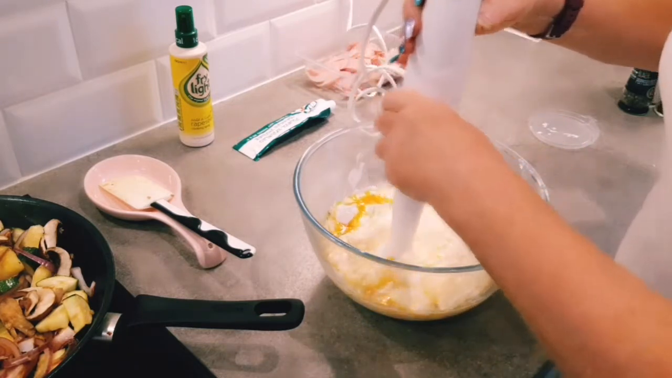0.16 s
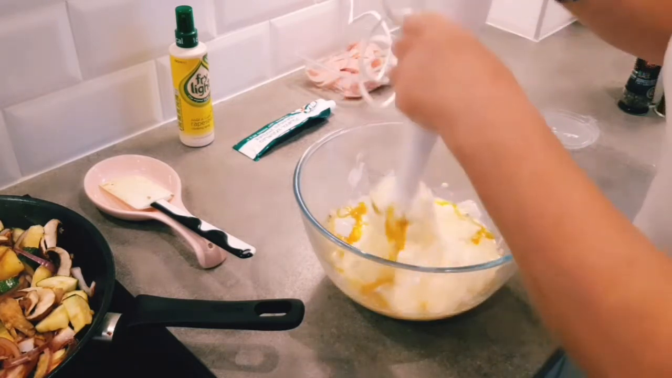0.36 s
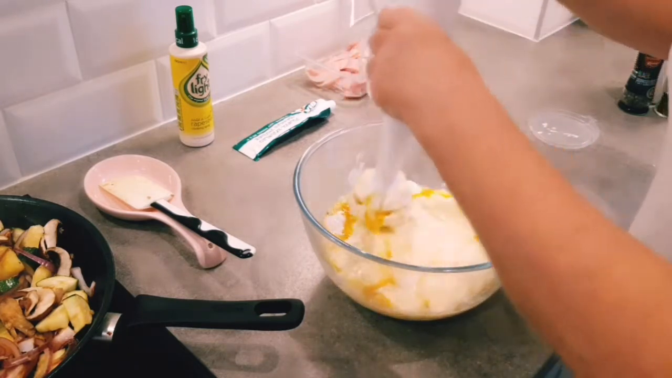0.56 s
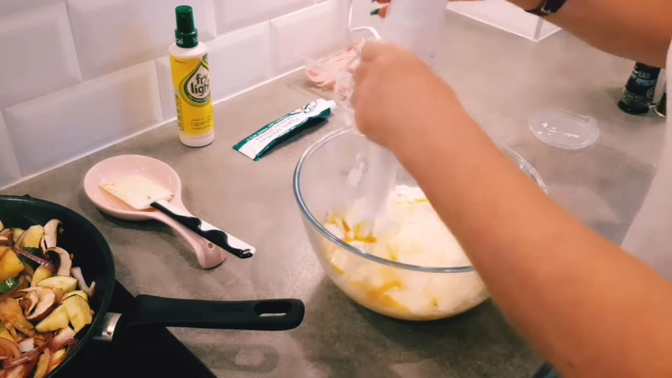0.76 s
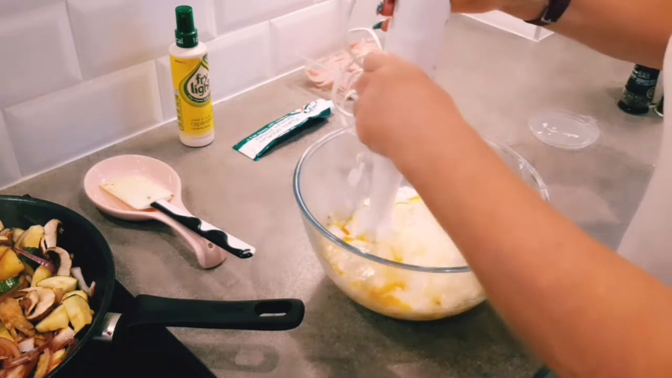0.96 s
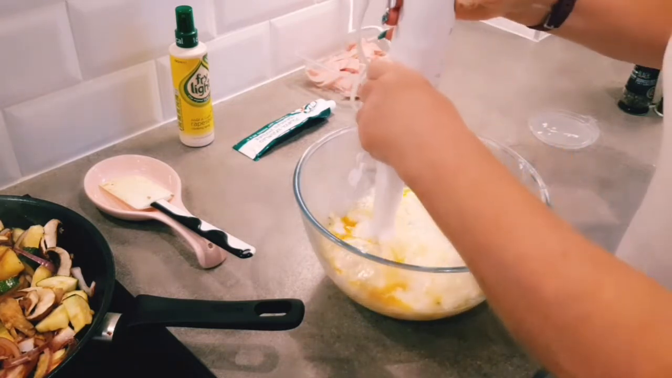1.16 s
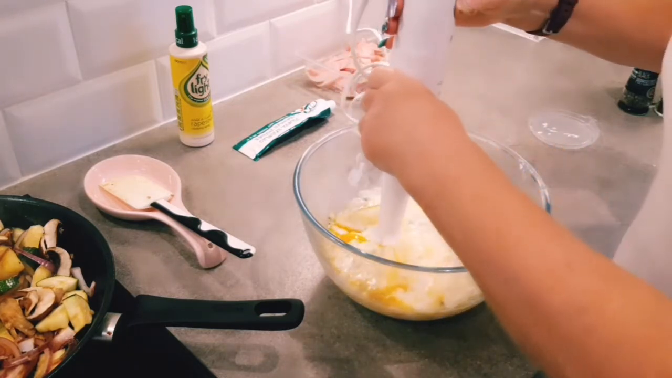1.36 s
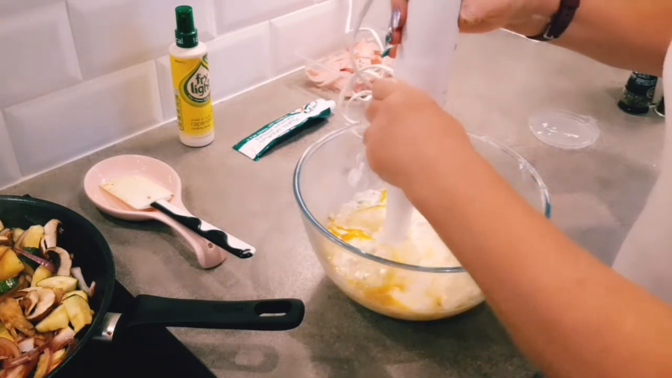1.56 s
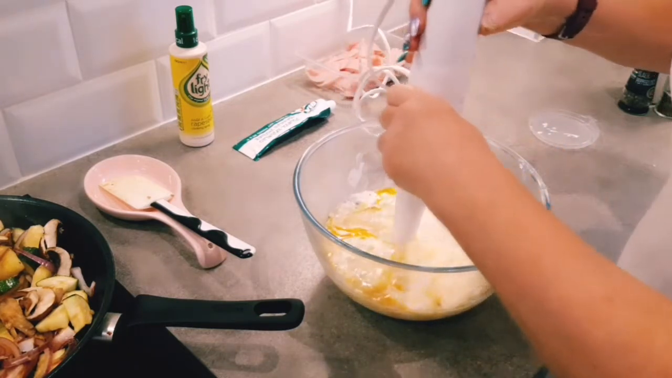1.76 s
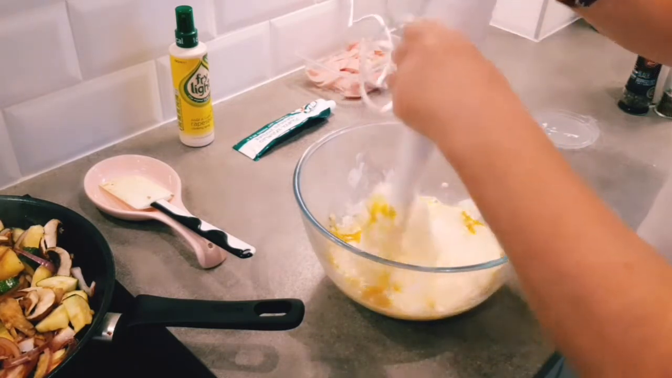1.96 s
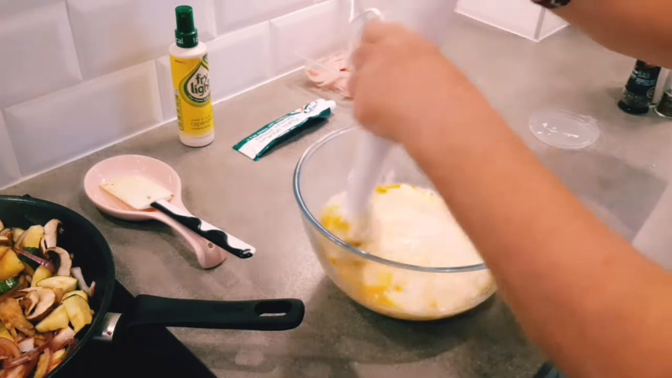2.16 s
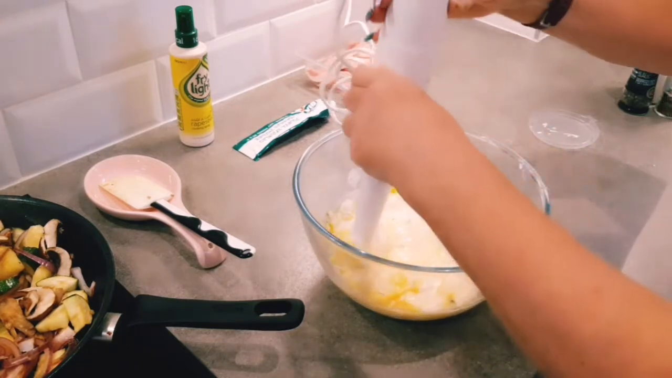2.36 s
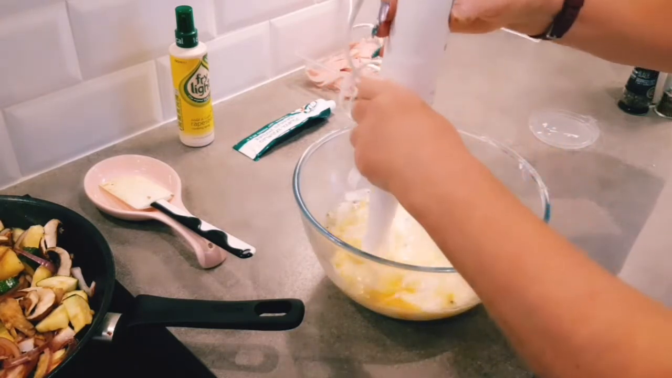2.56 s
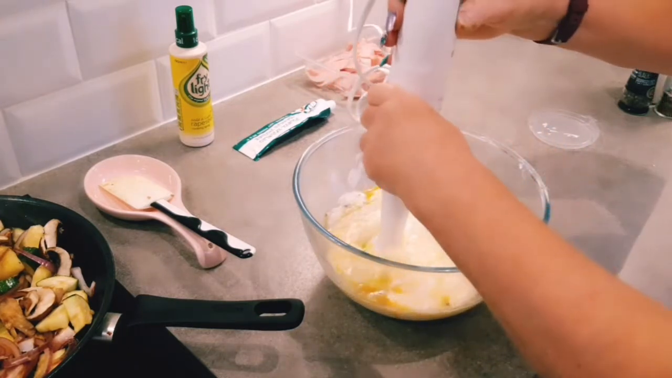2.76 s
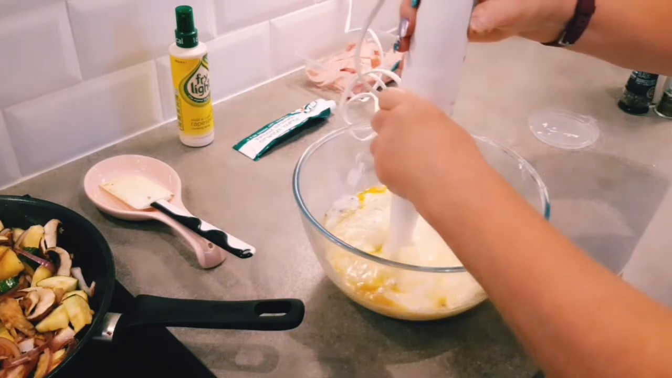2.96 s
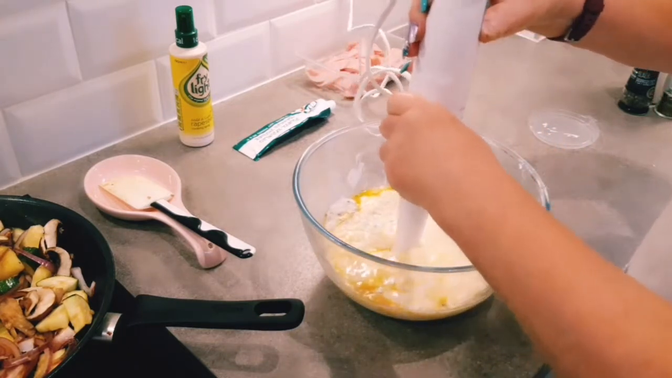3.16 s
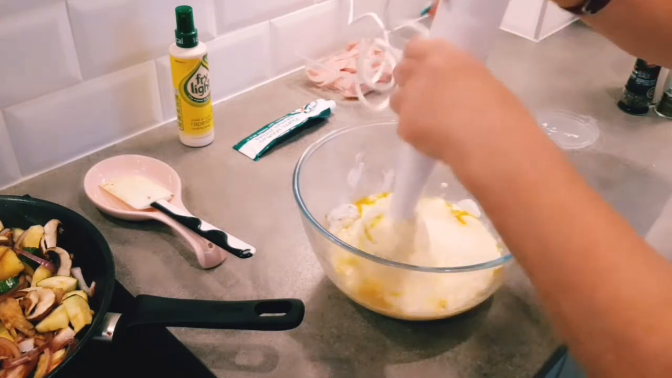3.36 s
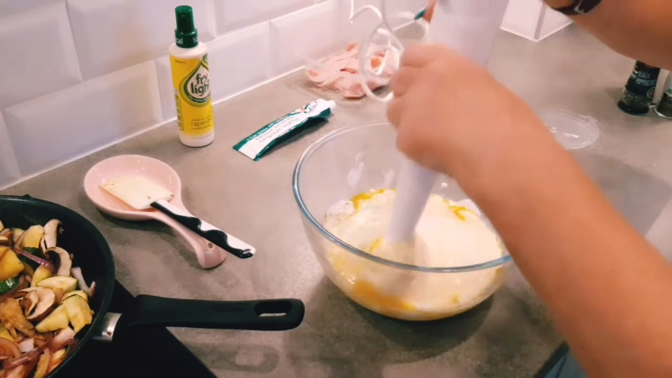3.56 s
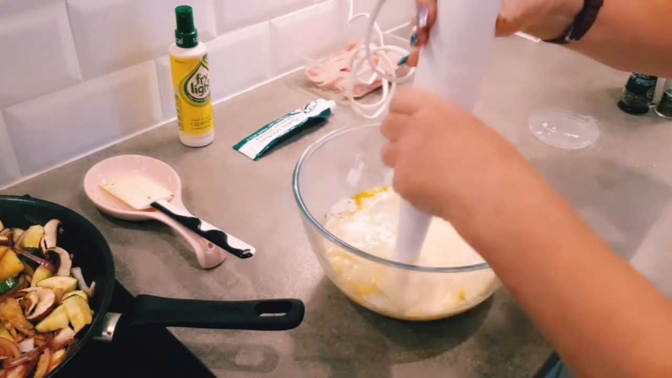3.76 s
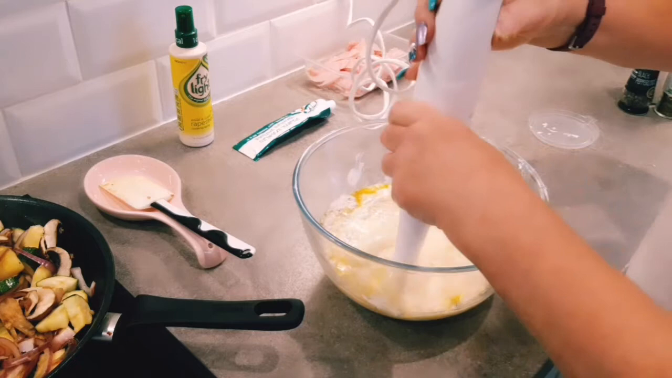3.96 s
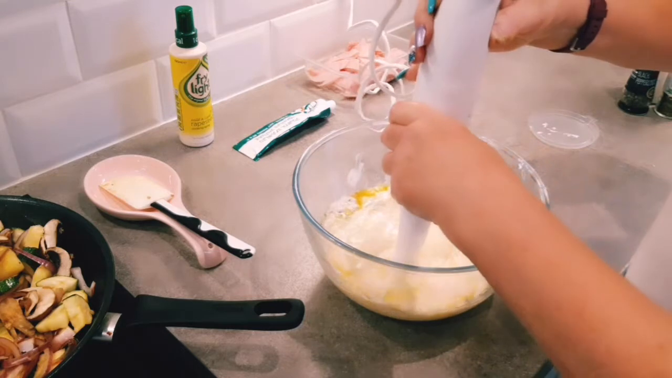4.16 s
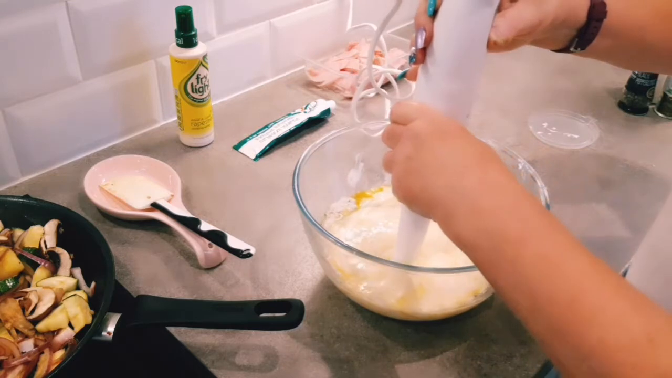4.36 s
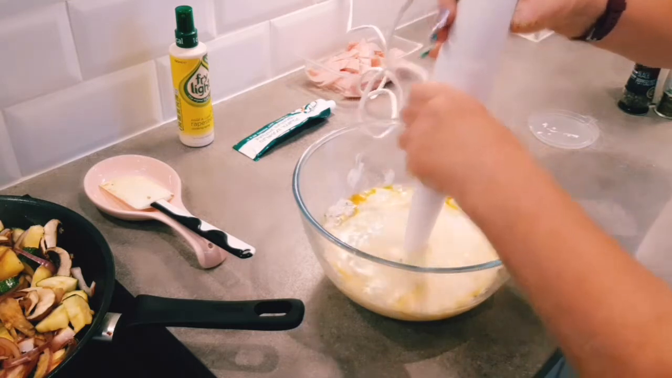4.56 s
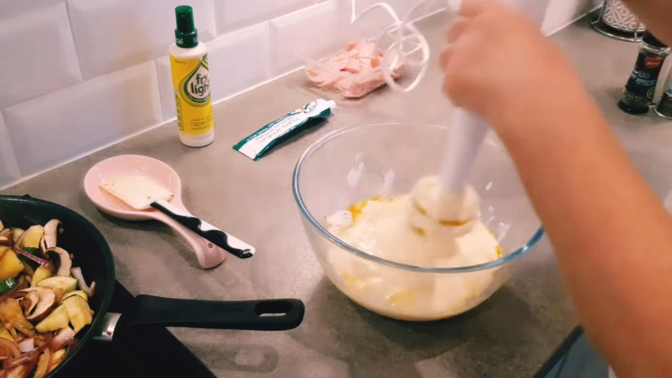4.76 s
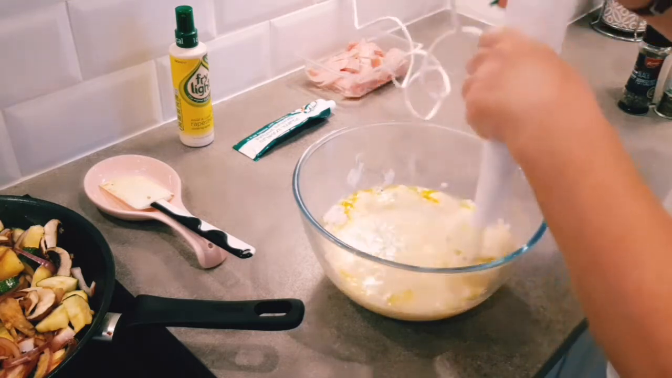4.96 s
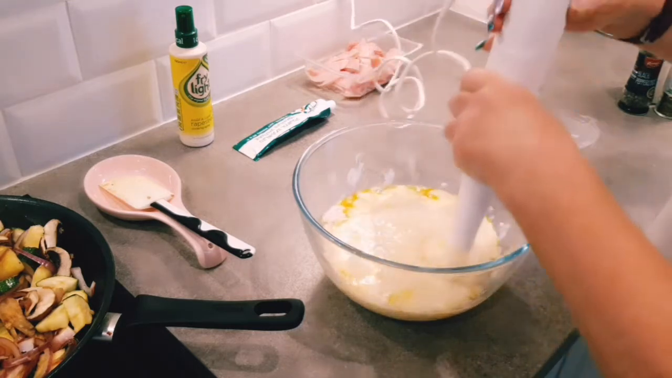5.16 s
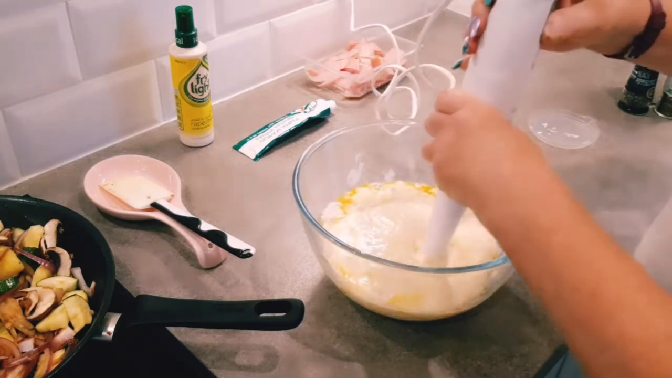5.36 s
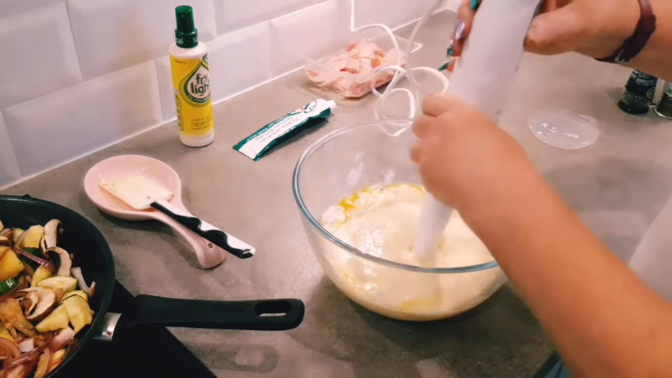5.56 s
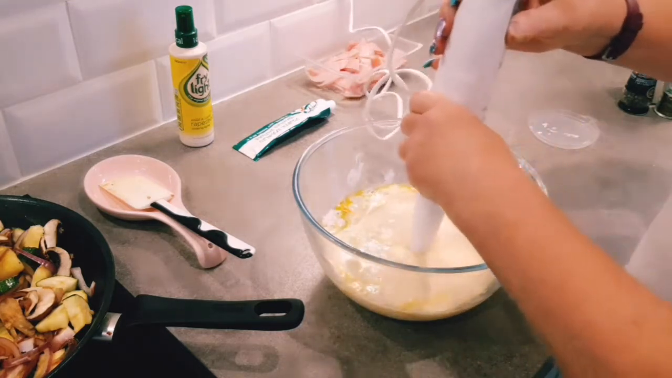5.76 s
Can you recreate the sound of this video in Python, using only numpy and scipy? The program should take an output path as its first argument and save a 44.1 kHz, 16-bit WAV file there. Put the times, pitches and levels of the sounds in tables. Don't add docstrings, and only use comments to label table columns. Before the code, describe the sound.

A hand-held stick blender whirs in five short bursts through thick batter in a glass bowl, with glassy knocks between bursts in a kitchen.

```python
import sys
import numpy as np
from scipy import signal
from scipy.fft import rfft, irfft, next_fast_len
from scipy.io import wavfile

SR = 44100
rng = np.random.default_rng(int(sys.argv[2]) if len(sys.argv) > 2 else 0)


def wav_record(signal):
    frames = np.transpose(np.atleast_2d(signal))
    bounded = np.clip(frames, -1, 1)
    quanta = np.round(bounded * 32767).astype(np.int16)
    wavfile.write(sys.argv[1], SR, quanta)


def elevation(decibels):
    levels = np.asarray(decibels, float)
    return 10 ** (levels / 20)


N = 260190

# (press [s], release [s], roar level [dB], roar rise [s], drone offset at start [dB])
PRESSES = [
    (-.4, 0.159, -20.5, .04, 15),
    (1.125, 1.729, -21, 0.024, -17.5),
    (2.552, 3.175, -21, 0.023, -29),
    (3.951, 4.472, -20, 0.025, 2),
    (5.272, 5.815, -21, 0.033, -9),
]


def batter():
    # (frequency [Hz], density [dB per Hz])
    roar_spectrum = [(45, -51), (130, -4.5), (204, -16.5), (300, -4.5), (444, -10.5), (600, -7),
                     (1500, -10), (2250, -12), (2600, -20.5), (4700, -21.5), (6300, -31), (7900, -52),
                     (8500, -35), (12500, -29.5)]
    # (frequency [Hz], bandwidth [Hz], level [dB])
    resonances = [(275, 30, -24), (400, 35, -20), (510, 35, -21), (610, 45, -15), (735, 70, -17),
                  (955, 70, -15), (1158, 50, -17), (1450, 30, -21), (1805, 75, -15), (2830, 50, -27)]
    whirr_db, dulling_db_per_s = 6.5, 23
    gain, rumble_db, drone_db, hiss_db = churning()
    since_off = burst_clock()[2]
    dulling_db = -dulling_db_per_s * since_off
    shift_db = (rumble_db + 10.5, drone_db + 8.5, dulling_db, hiss_db + 10.5)
    sound = banded_noise(roar_spectrum, patchy_db=1.5, likeness=0.97, shift_db=shift_db)
    white = rng.standard_normal((2, N))
    for hz, width, level_db in resonances:
        r = np.exp(-np.pi * width / SR)
        peak = signal.lfilter([1, 0, -1], [1, -2 * r * np.cos(2 * np.pi * hz / SR), r * r], white)
        lasting_db = np.zeros(N)
        if hz < 700:
            lasting_db = lasting_db + .5 * (drone_db + 8.0)
        if hz == 610:
            lasting_db = lasting_db + whirr_db * np.tanh(since_off / .06)
        if hz > 1300:
            lasting_db = lasting_db + dulling_db
        swelling = elevation(level_db + lasting_db + 1.53 * drift(4.4))
        sound = sound + swelling * stereo_noise(hz, rms_one(peak), 1)
    return gain * elevation(2.5) * sound


def churning():
    # (time [s], level [dB], length [s])
    lumps = [
        (.008, 0, .02),
        (1.142, -4, 0.0067),
        (3.992, 1.5, 0.0047),
        (1.18, -1, .015),
        (2.714, 4, 0.0058),
        (2.778, 2.5, 0.0068),
        (4.193, 1, 0.0043),
        (5.89, 2.5, 0.011),
    ]
    drop_db, drop_s, coast_db_per_s = 4, 0.033, 91.5
    lows_linger_db_per_s = 6
    which, since_on, since_off = burst_clock()
    roar_db, rise, deficit_db = np.transpose(PRESSES)[2:, which]
    for s, db, length in lumps:
        roar_db = roar_db + db * np.exp(-((np.arange(N) / SR - s) / length) ** 2)
    fall_db = drop_db * (1 - np.exp(-since_off / drop_s)) + coast_db_per_s * since_off
    gain = (1 - np.exp(-since_on / rise)) ** 2 * elevation(roar_db - fall_db)
    coast = 1 - np.exp(-since_off / 0.02)
    linger_db = lows_linger_db_per_s * since_off
    rumble_db = -18.5 + 4.5 * coast + linger_db
    drone_db = -8 + deficit_db * np.exp(-since_on / .15) + 2 * coast + linger_db / 2
    hiss_db = -16 + 15.5 * np.exp(-since_on / rise) + 4.5 * coast
    return gain, rumble_db, drone_db, hiss_db


def motor():
    # (settling speed [Hz], shortfall at start [Hz], catch-up [s],
    # climb as the batter thins [Hz per s])
    spin_up = [(154, 0, .1, 0), (141.2, 25.3, .08, 25.4), (151.5, 27.3, .13, 12.9), (150.5, 14, .05, 7),
               (145.9, 17, .13, 14.4)]
    # (1st multiple [dB], 2nd [dB], 4th [dB], mains buzz [dB])
    grip_levels = [(-30, -34, -30.5, -49), (-28.5, -31, -21, -44.5), (-37.5, -31.5, -24, -50),
                   (-34.5, -34.5, -26.5, -60), (-35.5, -31, -21.5, -36.5)]
    # (frequency [Hz], level [dB])
    housing_response = [
        [(115, -19), (130, -1), (140, -4), (149, -1.5), (157, -16)],
        [(280, -13), (300, -25), (308, 2.5), (316, 6), (320, -17)],
        [(540, -19), (570, -6), (600, -3.5), (635, 2.5)],
    ]
    hum_rise_s, hum_fall_db_per_s = .03, 260
    buzz_rise_s, buzz_fall_db_per_s, mains_hz = 0.13, 200, 100
    which, since_on, since_off = burst_clock()
    settle, shortfall, catch_up, climb = np.transpose(spin_up)[:, which]
    turns = settle - shortfall * np.exp(-since_on / catch_up) + climb * (since_on - since_off)
    *levels_db, buzz_db = np.transpose(grip_levels)[:, which]
    phase = 2 * np.pi * np.cumsum(turns * (1 + 0.0016 * drift(30.0))) / SR
    hum = 0
    for k, db, housing in zip((1, 2, 4), levels_db, housing_response):
        level_db = db + at_hz(housing, k * turns) + swell_db(k) + 0.3 * drift(45.0)
        hum = hum + elevation(level_db) * np.sin(k * phase)
    hum_since_off = burst_clock(lead=0.026)[2]
    hum = hum * (1 - np.exp(-since_on / hum_rise_s)) * elevation(-hum_fall_db_per_s * hum_since_off)
    buzz_level = elevation(buzz_db - buzz_fall_db_per_s * since_off + 2.0 * drift(9.0))
    buzz = (1 - np.exp(-since_on / buzz_rise_s)) * buzz_level
    return np.sqrt(2) * (hum + buzz * np.sin(2 * np.pi * mains_hz * np.arange(N) / SR))


def swell_db(multiple):
    # (time [s], length [s], multiple of the shaft speed, level [dB])
    hand_shifts = [
        (.1, .05, 2, 4),
        (2.64, .04, 1, 8),
        (3.17, .03, 1, 12),
        (3.2, .05, 4, 9),
        (4.23, .08, 1, 5),
        (4.43, .05, 2, 3),
        (1.3, .06, 4, 3),
        (5.3, .06, 1, -10),
        (5.71, .08, 4, 5),
        (5.8, .06, 2, 4),
    ]
    t = np.arange(N) / SR
    return sum(db * np.exp(-((t - s) / length) ** 2) for s, length, k, db in hand_shifts if k == multiple)


def burst_clock(lead=0):
    t, (on, off) = np.arange(N) / SR, np.transpose(PRESSES)[:2]
    which = np.searchsorted(on, t) - 1
    return which, t - on[which], np.maximum(t - off[which] + lead, 0)


def knocks():
    # (time [s], crack level [dB], note level [dB], note frequency [Hz],
    # worktop thud level [dB])
    set_downs = [
        (0.6753, -24.5, -21, 1690, -29),
        (2.1926, -18, -20.5, 1810, -26),
        (3.6629, -31.5, -29.5, 1810, -30.5),
        (4.9372, -25.5, -36, 2048, -30.5),
        (5.1758, -40, -68, 2513, -74.5),
        (5.2782, -37, -40, 1520, -44),
    ]
    # (frequency [Hz], level [dB], T60 [s])
    worktop_modes = [(105, -8, .25), (129, 1, .35), (165, -4, .25), (222, -6, .2), (268, -5, .2),
                     (328, -3, .2), (441, -11, .15), (497, -11, .25)]
    # (frequency [Hz], level [dB], T60 [s])
    low_glass_modes = [(389, -1, .6), (397, -14, .5), (641, -17, .4)]
    tick, push, rocking = np.zeros((3, N))
    t = np.arange(8000) / SR
    chances = rng.standard_normal((len(set_downs), 2, 8000))
    for (s, crack_db, note_db, note_hz, thud_db), chance in zip(set_downs, chances):
        i = round(s * SR)
        note = np.sin(2 * np.pi * note_hz * t) * (t / .0011) * np.exp(1 - t / .0011)
        crack_decay = np.exp(-t / .006) + elevation(-11) * np.exp(-t / .03)
        crack = chance[0] * (1 - np.exp(-t / .002)) * crack_decay
        tick[i:i + 8000] += elevation(crack_db + 2.5) * crack + elevation(note_db) * note
        push[i + round(.007 * SR)] += elevation(thud_db - 5)
        rustle = (1 - np.exp(-(t / .008) ** 2)) * np.exp(-t / 0.08)
        rocking[i:i + 8000] += elevation(thud_db + 8) * chance[1] * rustle
    tick_band = signal.butter(4, [700, 5000], "band", fs=SR, output="sos")
    thud_band = signal.butter(3, [90, 500], "band", fs=SR, output="sos")
    body = ring(push, worktop_modes + low_glass_modes) + rocking
    return signal.sosfilt(tick_band, tick) + signal.sosfilt(thud_band, body)


def glass():
    # (time [s], level [dB],
    # tilt away from the main mode [dB per octave])
    touches = [
        (.6755, -41, -9),
        (2.1929, -36.5, 0),
    ]
    # (frequency [Hz], level [dB], T60 [s])
    high_glass_modes = [(958, -6, .5), (966, -9, .45), (1745, -5, .4), (1736, -5, .4), (1722, -9, .3),
                        (2692, -3, .3), (2712, -7, .25), (3822, -5, .3), (3790, -8, .25), (5190, -12, .1)]
    spark_band = signal.butter(4, 9000, "high", fs=SR, output="sos")
    t = np.arange(3000) / SR
    out = np.zeros(N)
    for s, level_db, tilt_db in touches:
        start = round(s * SR)
        touch = signal.unit_impulse(N, start) * elevation(level_db)
        tilted = [(hz, db + tilt_db * abs(np.log2(hz / 1740)), t60) for hz, db, t60 in high_glass_modes]
        out += ring(touch, tilted)
        spark = rng.standard_normal(3000) * np.exp(-t / 0.019) * elevation(level_db + 3.0 * tilt_db + 2)
        out[start:][:3000] += signal.sosfilt(spark_band, spark)
    return out


def kitchen(x):
    t60_s, wall_cut_hz = .6, 5000
    size = next_fast_len(N + SR)
    hz = np.arange(size // 2 + 1) * SR / size
    out = np.zeros((2, len(hz)), complex)
    for k, lag in enumerate(rng.uniform(0.011, .04, 12)):
        loop = elevation(-60 * lag / t60_s) / (1 + 1j * hz / wall_cut_hz) * np.exp(-2j * np.pi * hz * lag)
        out[k % 2] += loop / (1 - loop) * (-1) ** (k // 2)
    return irfft(rfft(x, size) * out, size)[:, :N]


def room_tone():
    # (frequency [Hz], density [dB per Hz])
    tone_spectrum = [(24, -54), (40, -21), (98, -13.5), (139, -9), (235, -11), (368, -4), (449, -17),
                     (838, -12), (1380, -19), (1680, -16), (2770, -18.5), (3140, -16), (4800, -16.5),
                     (7160, -29.5), (15500, -23.5)]
    return elevation(-47) * banded_noise(tone_spectrum, patchy_db=.7, likeness=.9)


def ring(push, modes):
    out = 0
    for hz, level_db, t60 in modes:
        r, w = elevation(-60 / (t60 * SR)), 2 * np.pi * hz / SR
        mode = signal.lfilter([0, np.sin(w)], [1, -2 * r * np.cos(w), r * r], push + 1e-18)
        out = out + elevation(level_db) * mode
    return out


def banded_noise(spectrum, patchy_db, likeness, shift_db=(0, 0, 0, 0)):
    size = next_fast_len(N)
    hz = np.maximum(np.arange(size // 2 + 1) * SR / size, 1)
    white = rfft(rng.standard_normal((2, size)))
    coloured = stereo_noise(hz, white, likeness) * elevation(at_hz(spectrum, hz))
    coloured = coloured / np.sqrt(np.mean(np.abs(coloured) ** 2) / size)
    octaves = np.clip(np.log2(hz / 1000), -5, 4)
    region_weights = np.eye(5)[[0, 1, 3, 4]]
    out, together = 0, .35 * drift(8.9)
    for octave in np.arange(-5, 4.1, .5):
        band = np.clip(1 - 2 * np.abs(octaves - octave), 0, 1)
        shares = [np.interp(octave, [-2, -1, 0, 1, 2.5], row) for row in region_weights]
        shift = sum(share * db for share, db in zip(shares, shift_db))
        flicker = elevation(shift + patchy_db * (together + drift(21.0)))
        out = out + flicker * irfft(coloured * band, size)[:, :N]
    return out


def stereo_noise(hz, white, likeness):
    # (frequency [Hz], likeness [0-1])
    coherence = [(40, .5), (80, 0.8), (130, 0.9), (300, 1), (640, 0.7), (1400, 0.84), (3000, 0.24),
                 (6000, 0), (15000, 0)]
    alike = np.clip(likeness * at_hz(coherence, hz), 0, 1)
    return np.sqrt(1 + alike) * white[0] + np.sqrt(1 - alike) * white[1] * [[1], [-1]]


def drift(rate):
    r = np.exp(-80 * np.pi * rate / SR)
    slow = signal.lfilter([1], [1, -2 * r, r * r], rng.standard_normal(N // 40 + 2002))[2000:]
    return np.interp(np.arange(N) / 40, np.arange(len(slow)), rms_one(slow))


def at_hz(points, hz):
    table_hz, level = np.transpose(points)
    return np.interp(np.log(hz), np.log(table_hz), level)


def rms_one(x):
    return x / np.sqrt(np.mean(x ** 2) + 1e-20)


def scene():
    hum, hits = motor(), knocks() + glass()
    echo = kitchen(elevation(-20.5) * hum + elevation(-15) * hits)
    return hum + hits + echo + batter() + room_tone()


def top_cut(x):
    return signal.sosfilt(signal.butter(12, 16230, fs=SR, output="sos"), x)


def record(dry):
    # (frequency [Hz], left minus right [dB])
    port_difference = [(60, 3.0), (92, 3.0), (140, 2.0), (210, 0.5), (330, 1.0), (500, 3.0), (770, 3.5),
                       (1170, 5.5), (1790, 8.5), (2740, 8.0), (4190, 10.5), (6410, 2.0), (9810, -5.5),
                       (15000, -1.0)]
    # (frequency [Hz], level [dB])
    common_dip = [(7600, 0), (8400, -6.5), (10500, -10), (12000, -7.5)]
    left_lag_s, top_hz = .0001, 15750
    peak_level = 1.3
    size = next_fast_len(N + 2048)
    hz = np.maximum(np.arange(size // 2 + 1) * SR / size, 1)
    tilt = elevation(at_hz(port_difference, hz) / 2)
    left = tilt * np.exp(-2j * np.pi * hz * left_lag_s)
    ports = np.array([left, 1 / tilt]) * 2 / (tilt + 1 / tilt)
    ports = ports * elevation(at_hz(common_dip, hz)) * (hz < top_hz)
    heard = irfft(rfft(dry, size) * ports, size)[:, :N]
    mix = np.tanh(heard / peak_level) * peak_level
    return top_cut(mix)


dry = scene()
out = record(dry)
wav_record(out)
```